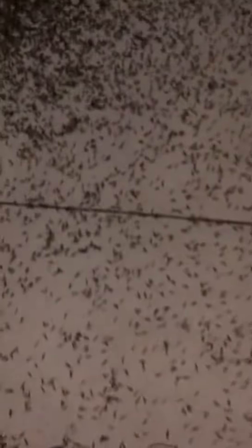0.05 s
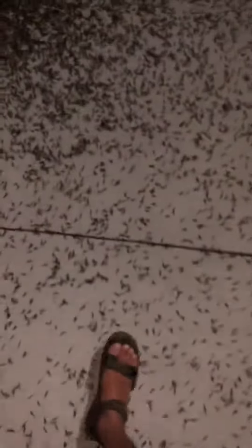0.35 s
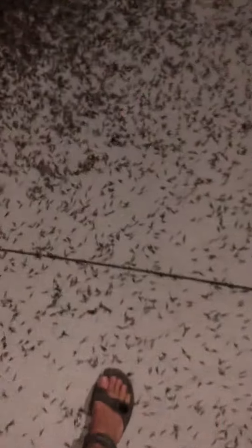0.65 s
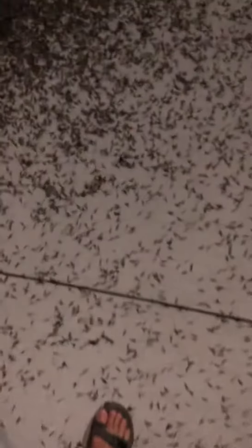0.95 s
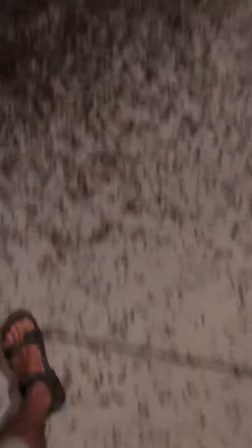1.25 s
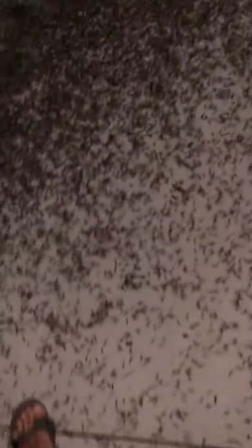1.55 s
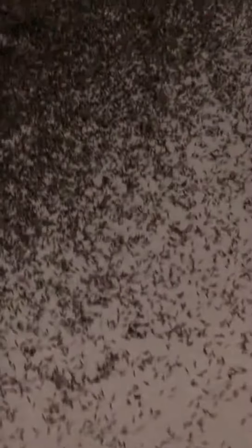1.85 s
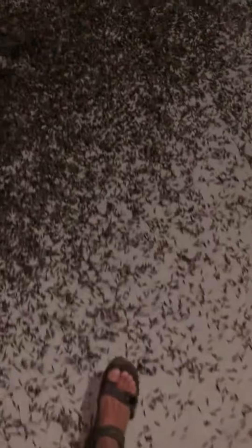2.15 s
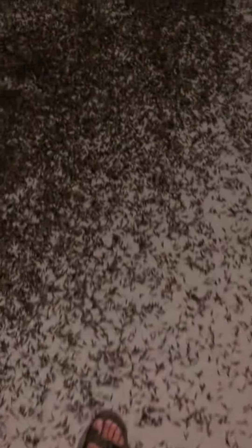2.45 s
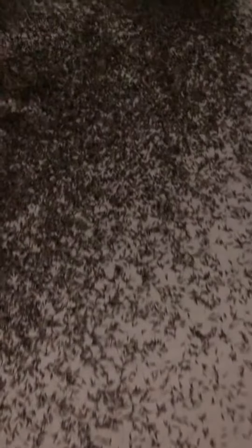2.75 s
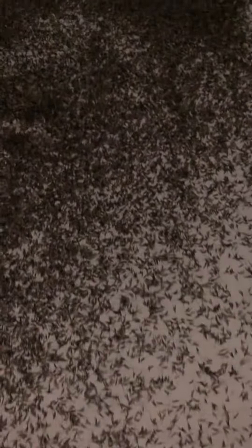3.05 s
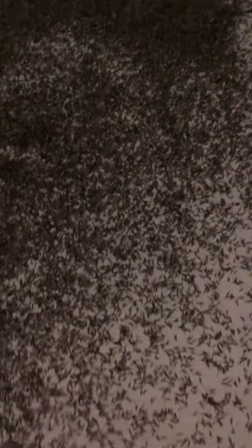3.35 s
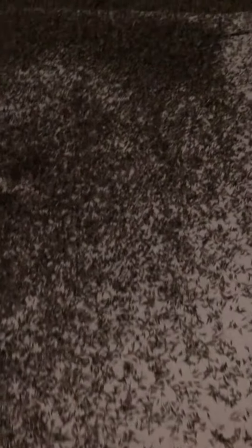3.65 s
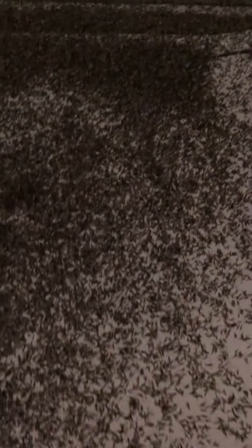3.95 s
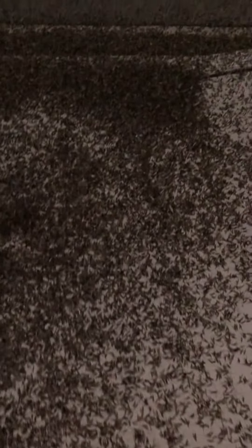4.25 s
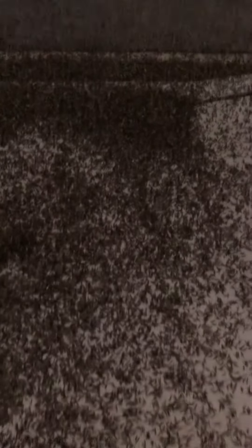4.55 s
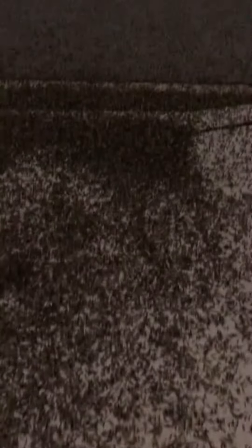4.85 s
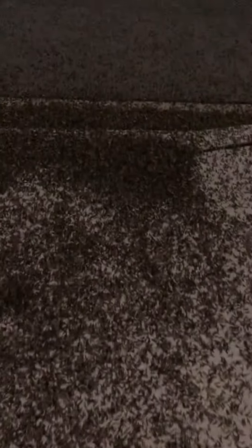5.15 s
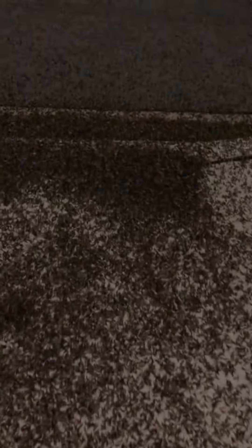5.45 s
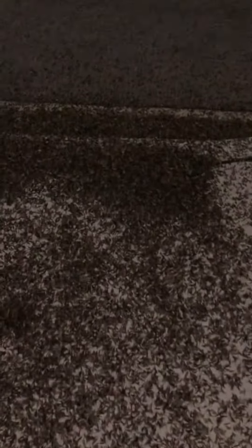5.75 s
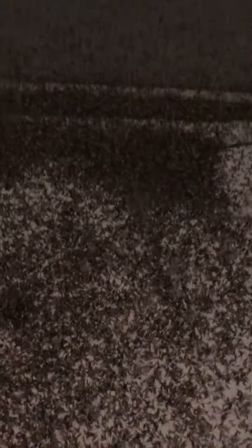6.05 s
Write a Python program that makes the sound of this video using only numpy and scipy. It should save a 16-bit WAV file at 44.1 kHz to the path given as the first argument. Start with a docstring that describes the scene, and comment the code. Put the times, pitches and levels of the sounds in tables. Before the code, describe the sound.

Someone in sandals takes six slow steps over pavement covered with small insects. Each step crunches, with sharp shell pops, fine crackling and a soft rustle of the sole. Air thumps against the close hand-held microphone during the first half. After four steps the walker almost stops, then takes two more. Live insects tick faintly over a distant outdoor rumble and machinery hum.

```python
"""Sandals on insects at night

Six slow steps over pavement covered with small insects, from the microphone of a hand-held camera.
Each rolls from heel to ball to toes: shells burst in sharp pops, legs and wings crackle, the sole
rustles. Live insects tick all around. Air buffets the microphone until the walker comes almost to
a stand before the last two steps. Far off lie a faint outdoor rumble and the hum of machinery."""
import sys
import numpy as np
from scipy import signal
from scipy.fft import rfft, irfft
from scipy.io import wavfile
from scipy.ndimage import uniform_filter1d

SR = 44100
rng = np.random.default_rng(int(sys.argv[2]) if len(sys.argv) > 2 else 0)


def wav_out(sig):
    """Save sig, one row per channel (or a flat mono array), as 16-bit PCM at SR to the path in sys.argv[1]."""
    wavfile.write(sys.argv[1], SR, np.round(np.clip(np.atleast_2d(sig).T, -1, 1) * 32767).astype(np.int16))


N = 273420

# the largest shells bursting underfoot: start_s, energy_db, pitch_hz, q
LARGE_SHELLS = [(0.348, -22, 8880, 0.11), (0.451, -23, 7600, 0.083), (0.5165, -13, 4740, 0.35),
                (0.5743, -8.5, 2000, 0.66), (0.6046, -6.5, 3240, 0.55), (0.6929, -9, 3600, 0.65),
                (0.7891, -22.5, 7800, 0.31), (0.8497, -15.5, 2580, 0.4), (0.9744, -19.0, 3300, 0.44),
                (1.0397, -20.5, 5750, 0.44), (1.1767, -5.0, 4060, 0.43), (1.3819, -6, 3720, 0.59),
                (1.4066, -4.5, 3460, 0.62), (1.4789, -18.5, 2900, 0.18), (1.4901, 0.0, 4370, 0.67),
                (1.5783, -11, 4360, 0.36), (1.6275, -15, 3750, 0.3), (2.0167, -8.5, 6740, 0.23),
                (2.1447, -15.0, 3590, 0.64), (2.1915, 3.0, 5150, 0.6), (2.3853, -23, 4450, 0.27),
                (2.4631, -9.5, 3140, 0.67), (2.4766, -11.5, 2780, 0.4), (2.5285, -14, 1930, 0.52),
                (2.5495, 2.0, 3400, 0.52), (2.637, -13.5, 4600, 0.45), (2.7134, -20.5, 3300, 0.46),
                (2.7961, -19, 2700, 0.38), (2.8732, -12.5, 3440, 0.44), (3.443, -13.5, 4130, 0.42),
                (3.464, -16.5, 3040, 0.47), (3.4725, -12, 2370, 0.44), (3.4843, -6.5, 3320, 0.38),
                (3.4904, -6, 4640, 0.6), (3.5678, -10, 2130, 0.76), (3.592, -12, 3060, 0.41),
                (3.6024, -10.5, 4340, 0.27), (3.627, -10, 4830, 0.44), (3.6386, -13, 2100, 0.65),
                (3.656, -20, 1340, 0.21), (3.667, -16.5, 2670, 0.46), (3.6974, -14.5, 2600, 0.6),
                (3.7139, -15.5, 2100, 0.55), (3.7348, -10, 3100, 0.55), (3.804, -6, 2743, 0.44),
                (3.8495, -5.5, 3900, 0.3), (3.8768, -4, 5000, 0.5), (4.002, -13.5, 1630, 0.41),
                (4.0197, -10, 3860, 0.35), (4.1226, -5.0, 3200, 0.52), (4.1502, -13, 2970, 0.39),
                (4.3229, -18, 2030, 0.58), (4.3941, -14.5, 4400, 0.31), (5.1628, -13.5, 10000, 0.084),
                (5.1814, -14.5, 2680, 0.69), (5.2186, -11.5, 2900, 0.5), (5.3403, -13.5, 1900, 0.47),
                (5.3503, -12.5, 3420, 0.34), (5.3531, -9.0, 2510, 0.44), (5.409, -4, 3860, 0.75),
                (5.4873, -15.5, 4800, 0.12), (5.5389, -10.5, 2700, 1), (5.5862, -17.5, 2630, 0.59),
                (5.6103, -15, 2080, 0.5), (5.6192, -7, 3900, 0.3), (5.6513, -14.5, 2450, 0.74),
                (5.6706, -18.5, 1980, 0.43), (5.7005, -12.0, 2850, 0.43), (5.7332, -10.5, 2550, 0.87),
                (5.7526, -14.5, 2570, 0.31), (5.7704, -12.0, 2800, 0.52), (5.7833, -15.5, 2760, 0.47),
                (5.8195, -13.5, 2700, 0.57), (5.9114, -21.5, 2590, 0.67), (6.0835, -22.5, 2420, 0.59),
                (6.1767, -23, 2510, 0.34)]


def undb(db):
    """Decibels to gain."""
    return 10 ** (np.asarray(db) / 20)


def unit(x):
    """Scale to rms 1."""
    return x / np.sqrt(np.mean(x ** 2))


def colour(points, size):
    """Causal frequency response through points of frequency_hz, gain_db."""
    hz, db = np.transpose(points)
    f = np.fft.rfftfreq(size, 1 / SR) + 1
    gain = undb(np.interp(np.log(f), np.log(hz), db))
    cepstrum = irfft(np.log(gain), size)
    cepstrum[1:size // 2] *= 2  # fold to minimum phase
    cepstrum[size // 2 + 1:] = 0
    return np.exp(rfft(cepstrum))


def noise(points):
    """Noise of rms 1 with the given spectrum."""
    return unit(irfft(rfft(rng.standard_normal(N)) * colour(points, N), N))


def wander(rate_hz):
    """Random drift of rms 1, gliding to a new value rate_hz times a second."""
    hold = int(SR / rate_hz)
    held = np.repeat(rng.standard_normal(N // hold + 1), hold)
    return unit(uniform_filter1d(held, hold)[:N])


def resonance(hz, q, size):
    """Response of three equal, heavily damped resonances in series, one row per event."""
    f = np.fft.rfftfreq(size, 1 / SR) + 1
    ratio = f / hz[:, None]
    stage = 1 / (1 + 1j * np.reshape(q, (-1, 1)) * (ratio - 1 / ratio))
    return stage ** 3


def place(times, energy_db, spectra):
    """Lay one short pulse at each time, with the given energy and spectrum."""
    waves = irfft(spectra)
    waves *= (undb(energy_db) / np.linalg.norm(waves, axis=1))[:, None]
    out = np.zeros(N + waves.shape[1])
    for start, wave in zip(np.clip(times * SR, 0, N - 1).astype(int), waves):
        out[start:start + len(wave)] += wave
    return out[:N]


def night(rumble_db=-58.5, waver_db=0.5, waver_rad=0.95):
    """Distant outdoor rumble and soft hiss, with the wavering hum of far machinery."""
    # tones of the machinery: pitch_hz, level_db
    hum_tones = [(118.4, -67.5), (174, -68), (290.7, -72)]
    # spectrum of the distant outdoors: frequency_hz, density_db
    rumble_spectrum = [(25, -32), (45, -14), (68, -1.5), (185, -8.5), (290, -11.5), (450, -16),
                       (1150, -21.5), (5000, -31), (15500, -40)]
    t = np.arange(N) / SR
    hum = sum(undb(db) * np.sqrt(2) * np.sin(2 * np.pi * hz * t + waver_rad * wander(12))
              for hz, db in hum_tones)
    return hum + noise(rumble_spectrum) * undb(rumble_db + waver_db * wander(2.76))


def walking(stop_s=3.9, fade_s=0.5):
    """1 at walking pace, fading to 0 as the walker comes almost to a stand."""
    return np.clip((stop_s - np.arange(N) / SR) / fade_s, 0, 1)


def airflow(breeze_db=-65, attack_s=0.041, release_s=0.024, sag_db_per_s=14.5):
    """Strength of the air at the microphone: draughts rise, sag and die over the breeze of walking."""
    # draughts as the camera swings: start_s, length_s, level_db
    draughts = [(-.03, 0.26, -45), (1.568, 0.45, -45), (2.453, 0.025, -50)]
    t = np.arange(N) / SR
    flow = undb(breeze_db) * walking()
    for start, length, db in draughts:
        edges = np.maximum(start - t, 0) / attack_s + np.maximum(t - start - length, 0) / release_s
        sag_db = sag_db_per_s * np.clip(t - start, 0, length)
        flow = np.hypot(flow, undb(db - sag_db) * np.exp(-edges))
    return flow


def microphone_wind(q=0.75, gust_db=1.0, size=8192):
    """Puffs and an uneven draught push on the microphone, making low thumps and a rumble."""
    # the strongest puffs of air: start_s, energy_db, pitch_hz
    air_puffs = [(.04, -16.5, 214), (0.113, -13.5, 198), (.311, -15.5, 93.6), (.349, -12, 117),
                 (.448, -14.5, 136), (1.574, -9.5, 167), (1.589, -2.5, 99), (1.626, -10, 202),
                 (2.116, -20, 160), (2.465, -18, 136)]
    times, db, hz = np.transpose(air_puffs)
    port = colour([(25, -35), (60, 0), (300, -3), (450, -10), (1000, -41)], size)
    puffs = place(times, db, resonance(hz, q, size) * port)
    draught = noise([(22, -27.5), (45, 3), (80, 2.5), (160, -1), (290, -11), (420, -21),
                     (1500, -51), (8000, -64)])
    return puffs + draught * airflow() * undb(gust_db * wander(29.9))


def presses():
    """Heel, ball and toes press in turn, longer in a slow step: time_s, length_s, level_db, pitch_hz."""
    # the footsteps: heel_lands_s, ball_lands_s, toes_push_off_s, level_db, pitch_hz
    steps = [(0.494, 0.582, 0.75, -57, 3000), (1.385, 1.485, 1.594, -53, 3900),
             (2.398, 2.479, 2.67, -59, 3000), (3.473, 3.61, 3.87, -52, 3040),
             (5.174, 5.341, 5.45, -51, 2650), (5.659, 5.809, 5.83, -52.5, 2260)]
    # heel, ball and toes within a step: length_share, offset_db, pitch_ratio
    foot_roll = [(.22, 0.5, 1.56), (.24, 2, .8), (.38, -2, 1)]
    return [(time, share * (toes - heel), db + offset_db, hz * ratio)
            for heel, ball, toes, db, hz in steps
            for time, (share, offset_db, ratio) in zip((heel, ball, toes), foot_roll)]


def rustle(gain_db=-6.5, grain_db=6.5, clothes_db=-69):
    """Clothes rustle softly at walking pace; the sole rubs the litter at each press."""
    # rubber sliding on litter: frequency_hz, density_db
    rub_spectrum = [(300, -6.5), (1000, 1), (1700, -6), (2400, -3), (3800, -11), (16000, -14.5)]
    t = np.arange(N) / SR
    coarse_t = t[::64]
    power = sum(undb(db) ** 2 * np.exp(-np.pi * ((coarse_t - time) / length) ** 2)
                for time, length, db, _ in presses())
    sole = undb(gain_db) * np.sqrt(np.interp(t, coarse_t, power))
    clothes = undb(clothes_db + 2 * wander(7.7)) * walking()
    hiss = noise(rub_spectrum)
    grain = unit(undb(grain_db * wander(900)))
    return hiss * grain * (sole + clothes)


def shell_pops(times, energy_db, hz, q, gap_s=0.0003577, fall_db=-8, splits=3, size=512):
    """A shell snaps, then gives way a few more times, ever more weakly; the spacing colours each pop."""
    # colour that all the shells share: frequency_hz, gain_db
    shell_colour = [(150, -55), (500, 8.5), (850, 5), (1300, 1.5), (1850, -.5), (2450, -4.5), (3400, 0),
                    (8000, -1), (15000, 1.5)]
    chance = rng.random((len(times), 2, splits))
    lags = gap_s * np.cumsum(2 * chance[:, 0], axis=1)
    strengths = np.sign(chance[:, 1] - .5) * undb(fall_db * np.arange(1, splits + 1))
    f = np.fft.rfftfreq(size, 1 / SR)
    snaps = 1 + np.sum(strengths[..., None] * np.exp(-2j * np.pi * f * lags[..., None]), axis=1)
    return place(times, energy_db, resonance(hz, q, size) * snaps * colour(shell_colour, size))


def live_insects(count=60, loudest_db=-30, range_db=14, lowest_hz=1800, octaves=2):
    """Live insects hop and tick faintly on the pavement all around."""
    when, size, pitch = rng.random((count, 3)).T
    energy_db = loudest_db - range_db * np.sqrt(size)
    return shell_pops(when * N / SR, energy_db, lowest_hz * 2 ** (octaves * pitch), q=0.62)


def large_shells():
    """The largest shells burst under the sandal, one sharp pop each."""
    return shell_pops(*np.transpose(LARGE_SHELLS))


def fragments(count=2, gain_db=-21, spread_db=3, delay_s=0.0012, octaves=0.69):
    """Small pieces of each large shell break just after it bursts, each at its own pitch."""
    times, db, hz, _ = np.repeat(LARGE_SHELLS, count, axis=0).T
    when, size, pitch = rng.standard_normal((len(times), 3)).T
    energy_db = db + gain_db + spread_db * size
    return shell_pops(times + delay_s * np.abs(when), energy_db, hz * 2 ** (octaves * pitch), q=0.49)


def crackle(count=30, gain_db=-6, spread_db=6, octaves=0.92):
    """Each press breaks a cloud of legs and wings: tiny snaps of uneven size and pitch."""
    times, length, db, hz = np.repeat(presses(), count, axis=0).T
    when, size, pitch = np.clip(rng.standard_normal((len(times), 3)), -2, 2).T
    starts = times + when * length / np.sqrt(2 * np.pi)
    share_db = db + 10 * np.log10(length * SR / count)  # the press's energy, split among the snaps
    energy_db = share_db + gain_db + spread_db * size
    return shell_pops(starts, energy_db, hz * 2 ** (octaves * pitch), q=0.77)


def small_shells(count=3, gain_db=-5, spread_db=4, octaves=0.53):
    """Each press bursts a few smaller shells, louder the harder and longer it is."""
    times, length, db, hz = np.repeat(presses(), count, axis=0).T
    when, size, pitch = rng.uniform(-1.1, 1, (len(times), 3)).T
    share_db = db + 10 * np.log10(length * SR / count)
    energy_db = share_db + gain_db + spread_db * size
    return shell_pops(times + when * length / 2, energy_db, hz * 2 ** (octaves * pitch), q=0.5)


def reflections(direct, near_db=-23, near_t60_s=0.076, far_db=-35, far_t60_s=0.51):
    """Legs and ground close by scatter each sound briefly; a faint wash returns from further away."""
    # small surfaces scatter mostly treble: frequency_hz, density_db
    scatter_spectrum = [(3500, -6), (8000, 0), (15000, -20)]
    t = np.arange(SR // 2) / SR
    tail = 0
    for db, t60 in ((near_db, near_t60_s), (far_db, far_t60_s)):
        scatter = noise(scatter_spectrum)[:len(t)] * undb(-60 * t / t60)
        tail = tail + undb(db) * scatter / np.linalg.norm(scatter)
    return direct + signal.fftconvolve(direct, tail)[:N]


def scene():
    """In mono: the pavement close by, air right on the microphone, the night in the distance."""
    close = large_shells() + fragments() + small_shells() + crackle() + rustle() + live_insects()
    return (reflections(close) + microphone_wind() + night())[None]


def record(dry, top_hz=16300):
    """The camera cuts the highest treble steeply."""
    return signal.sosfilt(signal.ellip(8, .2, 70, top_hz, fs=SR, output="sos"), dry)


dry = scene()
out = record(dry)
wav_out(out)
```